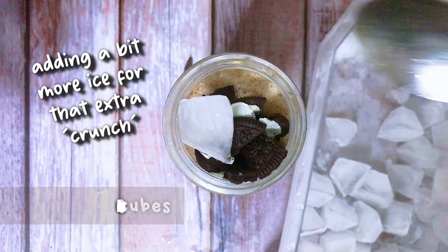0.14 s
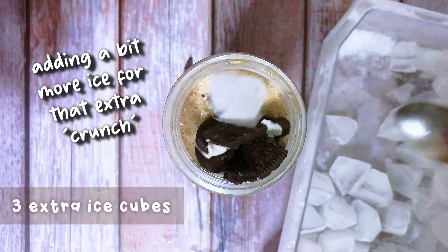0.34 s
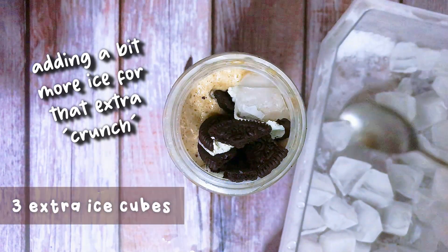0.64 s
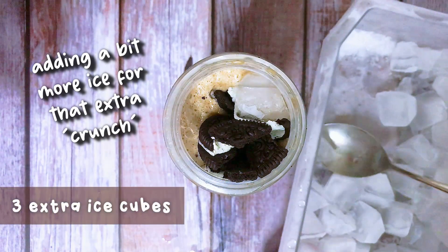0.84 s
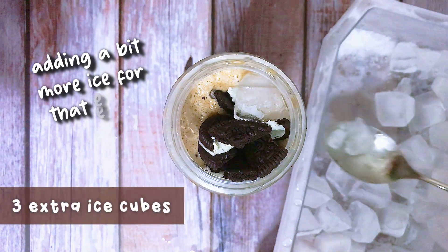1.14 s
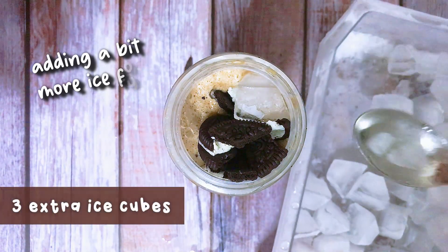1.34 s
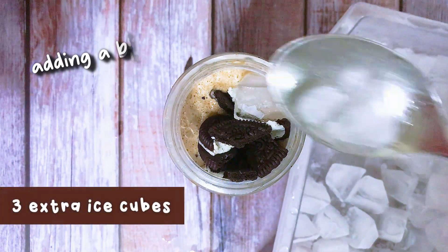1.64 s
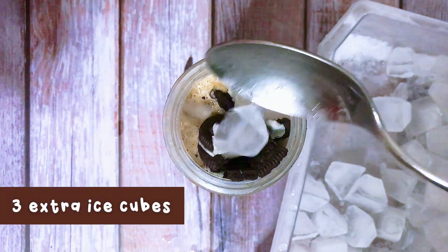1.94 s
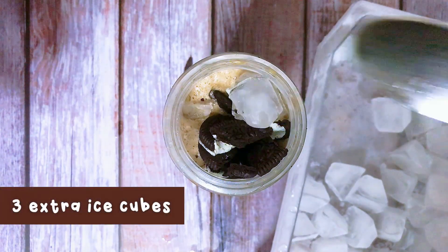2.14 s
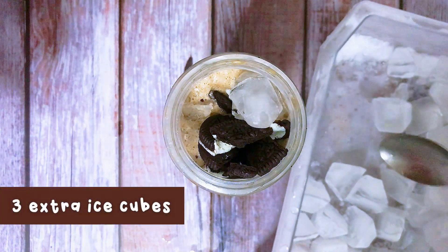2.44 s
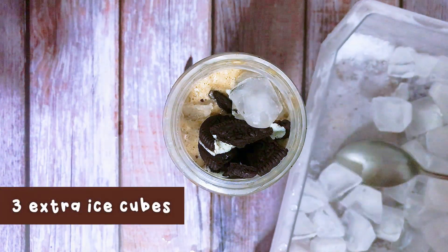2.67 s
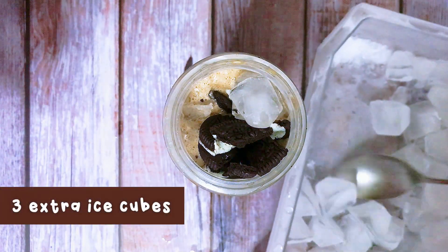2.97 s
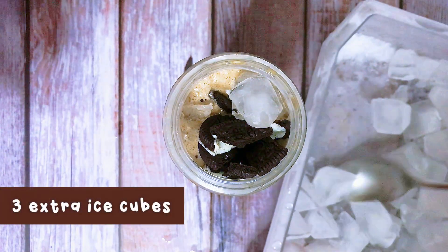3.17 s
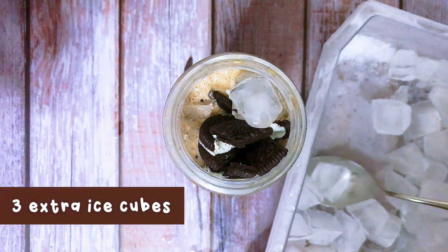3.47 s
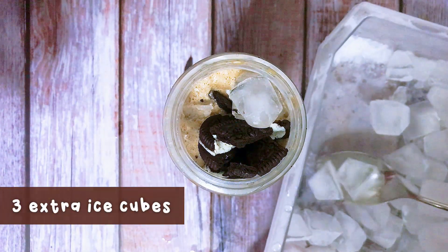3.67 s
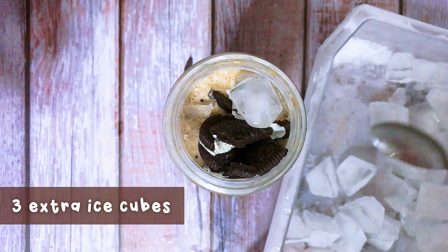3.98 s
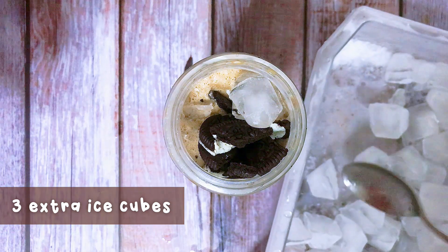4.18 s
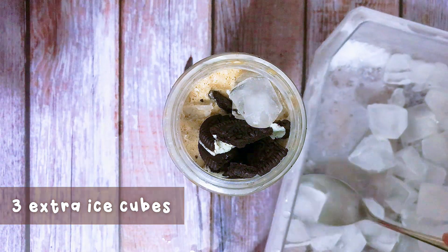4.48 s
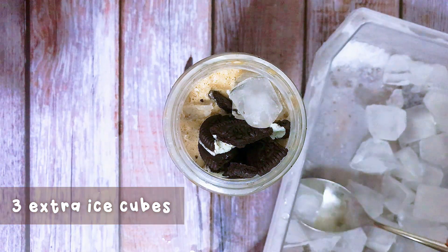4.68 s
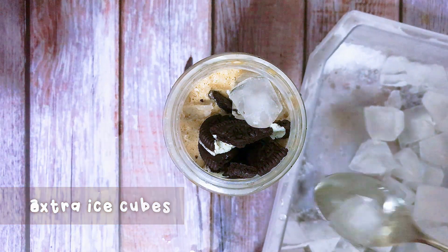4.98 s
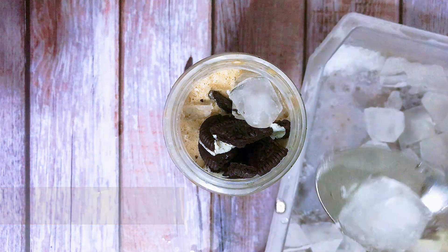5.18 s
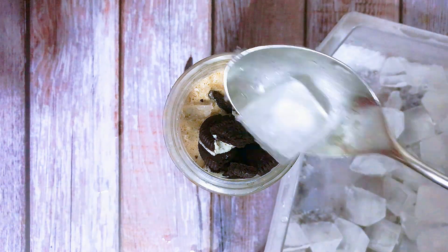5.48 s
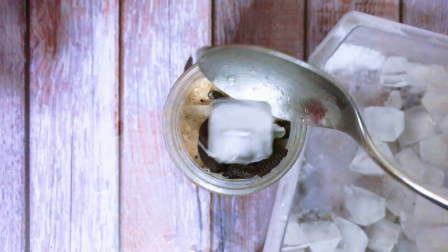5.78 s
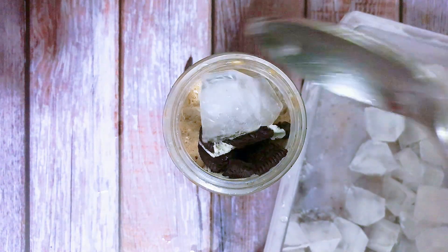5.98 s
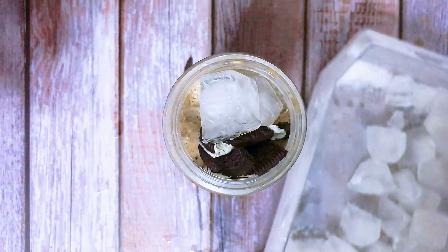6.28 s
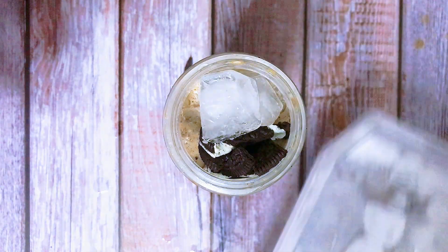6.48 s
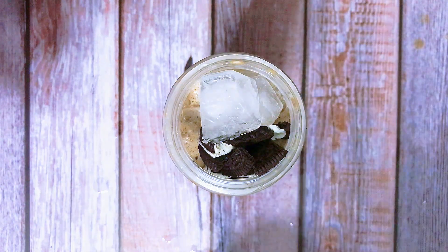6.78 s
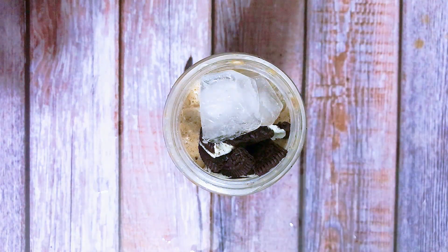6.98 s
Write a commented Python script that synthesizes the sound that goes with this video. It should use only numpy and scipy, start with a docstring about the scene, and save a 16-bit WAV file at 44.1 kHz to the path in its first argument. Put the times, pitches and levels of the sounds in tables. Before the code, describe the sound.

A metal spoon digs through ice cubes in a plastic bin, hard bright clacks and crunchy grating in bursts, with quiet pauses and soft jar ticks.

```python
"""Small kitchen: a metal spoon digs ice cubes out of a plastic bin and lowers them into iced coffee.
Knocks, jostles and light jar ticks are filtered noise rattles; grating, fizz and bin scuffs are slip grains.
Cube corners chink as decaying sines; the emptied spoon sings as resonant noise.
Sparse decaying reflections answer the ice; the dull background noise sinks while the scooping is loud."""
import sys
import numpy as np
from scipy import signal
from scipy.fft import rfft, irfft
from scipy.io import wavfile
from scipy.ndimage import uniform_filter1d, minimum_filter1d

SR = 44100
rng = np.random.default_rng(int(sys.argv[2]) if len(sys.argv) > 2 else 0)


def store_wav(level_fs):
    """Save 16-bit WAV to argv[1]."""
    pcm = np.round(np.clip(np.atleast_2d(level_fs), -1, 1) * 32767)
    wavfile.write(sys.argv[1], SR, pcm.T.astype(np.int16))


N = 313991
TAPS = 4096
HZ = np.fft.rfftfreq(TAPS, 1 / SR)
TIME_S = np.arange(N) / SR
BAND_LIMIT_HZ = 15600

# background before sinking: (time [s], level [dB], tilt above 750 Hz [dB/octave])
AIR_DRIFT = [(.2, -65.5, -3.5), (1.75, -63, -3.5), (2.5, -60, -5.5), (4.9, -62.5, -5), (5.45, -62, -1),
             (7.1, -61.5, 1.5)]
# background spectrum: (frequency [Hz], relative level [dB])
AIR_SPECTRUM = [(30, -31), (100, -26), (200, -20.5), (320, -14), (450, -4.5), (620, 4), (880, 5.5),
                (1100, -2.5), (1500, -9), (2000, -20.5), (2700, -24.5), (3800, -43.5), (6000, -46),
                (15000, -48.5)]
# bin shifts on the table, finally dragged away: (peak time [s], peak level [dB], swell rate [dB/s])
BIN_SCUFFS = [(.005, -52, 298.5), (0.519, -61, 81.5), (2.67, -55.5, 122), (4.36, -72, 200),
              (6.52, -62.5, 299.5), (7.07, -58.5, 62)]
SCUFF_STOP_DB_PER_S = 220
# spectrum of ice in the bin: (frequency [Hz], relative level [dB])
BIN_SPECTRUM = [(30, -42), (110, -39), (250, -34), (400, -25.5), (500, -16), (630, -6.5), (1000, 1.5),
                (1400, -0.5), (2000, -4), (3200, -6), (4200, -9), (5500, -16.5), (8000, -23), (14000, -29)]
# bin and spoon resonances: (frequency [Hz], width [Hz], nominal lift [dB])
BIN_SPOON_MODES = [(604, 81, 2.5), (683, 110, 3), (890, 32, 6), (975, 81, 2), (1145, 28, 1.5),
                   (1297, 20, 2), (1470, 30, 0.5), (1832, 80, 4), (2460, 87, 2), (3350, 74, 1),
                   (4080, 70, 3.5), (5243, 37, 3.5), (5942, 91, 2), (7000, 150, 3.5), (8150, 98, 3.5),
                   (8874, 150, 7.5), (9710, 50, 6)]
# room decay: (frequency [Hz], t60 [s])
ROOM_DECAY = [(200, .3), (500, .32), (1000, 0.29), (3000, 0.15), (7000, 0.09), (14000, .18)]
# cubes land or settle in the jar:
# (time [s], level over 10 ms [dB], hardness 1-5 kHz [dB/octave], upper edge [Hz])
JAR_TICKS = [(.395, -45.5, 5, 2980), (.46, -46.5, -3.5, 7800), (.477, -45, 2, 6800),
             (0.525, -42.5, 1, 7045), (2.058, -54, 4, 6460), (2.142, -55, -5, 9580), (2.154, -42, 5, 8200),
             (6.0, -47, -6.5, 6640), (6.086, -52, 2.5, 8530)]
TICK_DECAY_S, TICK_HOLLOW_HZ, TICK_CLACK_HZ = .028, 1450, 2420
# cube corners hit the spoon: (time [s], nominal level [dB])
CORNER_CHINKS = [(.467, -53), (0.524, -42.5), (0.553, -17.5), (1.177, -53), (2.133, -61), (2.154, -34),
                 (6.086, -45.5)]
# cube modes, before a small random size factor: (frequency [Hz], level [dB], t60 [s])
CUBE_MODES = [(6300, -5, .012), (7100, 3.5, 0.011), (7840, -2, 0.0078)]
# prominent knocks in the bin: (time [s], level over 10 ms [dB], rattle decay [s], hollow pitch [Hz],
# clack pitch [Hz], hardness 1-5 kHz [dB/octave], upper edge [Hz])
BIN_KNOCKS = [(.5501, -16.5, 0.043, 1490, 3190, -.5, 10500), (.573, -29.5, 0.031, 1600, 3800, 1.4, 9700),
              (.615, -37, .044, 1209, 4130, 0, 14000), (0.6691, -12.5, .027, 1140, 3740, 3, 15300),
              (0.678, -18.5, 0.032, 1670, 3100, 2.5, 13800), (0.7637, -29, 0.028, 1000, 2160, -1, 10400),
              (.815, -21, 0.024, 994, 2820, 7, 10300), (.831, -32, .08, 1000, 2860, -3.5, 13700),
              (.863, -23.5, 0.051, 1900, 3900, -1, 16000), (.908, -29, 0.026, 1810, 2590, -3.5, 8500),
              (.948, -42.5, .052, 814, 4650, -1, 9000), (1.133, -56.5, .05, 1012, 2070, -10, 3100),
              (1.153, -47, 0.034, 980, 2350, -4, 2800), (1.176, -40, .04, 950, 2370, -4, 7600),
              (1.186, -33.5, 0.067, 854, 2410, -.5, 5400), (1.304, -56, .045, 1830, 2260, -6.5, 4100),
              (2.674, -44.5, .031, 961, 2840, -4.5, 4600), (2.6988, -18.5, .048, 1084, 3320, 0.5, 9100),
              (2.728, -33, .029, 928.5, 2410, -2, 9900), (2.746, -27, 0.017, 1060, 3833, -0.3, 10400),
              (2.7744, -18, 0.02, 922, 2840, 1.6, 14000), (3.044, -32.5, .07, 1650, 2280, -2.5, 7200),
              (3.064, -24, 0.1, 1288, 4062, 0.8, 12700), (3.074, -23, 0.022, 1650, 3190, 3.5, 12910),
              (3.1103, -18, 0.028, 1360, 3780, -1, 11900), (3.138, -26, .06, 1723, 2350, -1.5, 16000),
              (3.157, -29.5, .036, 1030, 3010, -1, 16000), (3.214, -24, 0.023, 1040, 2700, -0.3, 13600),
              (3.24, -19.5, .019, 1054, 3120, 0, 8600), (3.339, -23.5, 0.056, 1330, 3290, 3.5, 5996),
              (3.419, -27.5, 0.048, 1424, 2650, 0.6, 5250), (3.486, -27.5, 0.037, 1743, 2800, 2, 5300),
              (3.762, -23.5, 0.11, 916, 2633, -8, 4500), (3.787, -25.5, 0.028, 1680, 2067, 5, 3530),
              (3.8301, -15.5, 0.027, 1200, 3290, 0.9, 7770), (3.937, -15, 0.021, 1301, 3045, 3, 8680),
              (3.943, -15.5, .055, 1226, 2530, 1.1, 8500), (4.011, -25.5, .05, 1100, 2100, -5.5, 9700),
              (4.029, -19, 0.031, 1314, 2940, 1, 9100), (4.072, -18.5, 0.021, 1120, 2840, 3, 7390),
              (4.099, -36.5, 0.034, 1180, 3100, -1, 7800), (4.272, -58, .052, 842, 2450, -17, 3200),
              (4.374, -27.5, 0.061, 803, 3205, -5, 3900), (4.402, -24.5, 0.027, 1260, 2370, -1, 7300),
              (4.432, -13.5, 0.074, 1086, 2478, 2, 11910), (4.442, -19, 0.11, 1010, 2460, -1.5, 16000),
              (4.463, -24.5, .027, 1140, 4290, 1.5, 13700), (4.501, -15.5, .05, 1270, 3230, 4.5, 16000),
              (4.514, -17, 0.044, 1120, 4140, 3, 16000), (4.566, -19, 0.039, 1185, 2040, 2.2, 16000),
              (4.569, -25, .04, 646, 2400, -9, 5000), (4.601, -18.5, 0.013, 1025, 2820, 0, 16030),
              (4.627, -29, .023, 1010, 2710, 3, 16000), (4.723, -50.5, .026, 1169, 2630, 6, 3700),
              (4.753, -48.5, .033, 1107, 2730, 2, 4300), (4.794, -40, 0.02, 1794, 2560, 6.5, 4183),
              (4.828, -51, 0.03, 1870, 2335, 0.5, 3376), (4.845, -43.5, .033, 1177, 2880, -0.3, 3590),
              (6.495, -51.5, .085, 993, 2530, -2, 3600), (6.84, -62.5, .04, 1006, 2500, -3.5, 3600),
              (7.007, -45.5, .055, 880, 2560, -1, 3390), (7.045, -51, .065, 906, 2350, -1, 3800)]
# a faint noisy lead-in a few milliseconds before each mid-stroke knock
LEAD_IN_S, LEAD_IN_DB, LEAD_IN_DECAY_S = .0055, -21, 0.062
# spoon strokes: (start [s], length before release [s], grating [dB], dry fizz [dB], jostle upper edge [Hz])
SPOON_STROKES = [(0.551, 0.27, -49, -59.5, 12000), (0.794, .14, -45, -56, 12000),
                 (1.187, .10, -60, -110, 3100), (2.709, 0.069, -39, -58.5, 10000),
                 (2.769, .035, -32.5, -37.5, 16000), (2.838, 0.085, -39, -44.5, 16000),
                 (2.929, 0.075, -43.5, -60, 14000), (3.025, 0.072, -42, -62.5, 8000),
                 (3.099, 0.067, -36.5, -44.5, 16000), (3.181, 0.094, -43, -66.5, 12000),
                 (3.301, 0.088, -40.5, -97, 5300), (3.422, 0.11, -50.5, -100, 5300),
                 (3.763, .33, -46, -86, 7000), (4.374, 0.059, -46.5, -93, 7000),
                 (4.431, .215, -35.5, -48.5, 16000), (4.696, .17, -63, -112, 3200)]
BITE_S, RELEASE_DB_PER_S = 0.028, 518.5
# dry ice on metal: (frequency [Hz], relative level [dB])
FIZZ_SPECTRUM = [(1000, -30.5), (3000, -9.5), (5000, 5.5), (8000, -1), (11000, -7), (15000, -6)]
# cubes jostled by a stroke; level is relative to the grating, spread is plus or minus
JOSTLES_PER_S, JOSTLE_DB, JOSTLE_SPREAD_DB, JOSTLE_DECAY_S = 45, 3.5, 4, 0.026
JOSTLE_HOLLOW_HZ, JOSTLE_CLACK_HZ = (900, 1720), (2160, 3960)
# background sinks above this scooping level
SINK_ABOVE_DB, SINK_DEPTH_DB, SINK_HOLD_S, SINK_GLIDE_S = -52, 16, .17, 0.17
# last cube slips off the spoon: (time [s], level [dB])
LAST_CUBE_RUB = [(5.86, -110), (5.872, -71.5), (5.892, -69), (5.91, -83), (5.97, -110)]
# spoon bowl modes: (frequency [Hz], width [Hz], relative level [dB])
BOWL_MODES = [(3560, 300, 2), (5530, 160, -7.5), (9530, 130, -5), (14120, 151.6, -8.5)]


def amp(db):
    """Decibels to gain."""
    return 10 ** (np.asarray(db) / 20)


def unit(x):
    """Scale to rms 1."""
    return x / np.sqrt(np.mean(x ** 2) + 1e-30)


def read(points, hz):
    """Interpolate a spectrum table on a log-frequency axis."""
    table_hz, value = np.transpose(points)
    return np.interp(np.log(hz + 1), np.log(table_hz), value)


def follow(rows, t_s):
    """Interpolate every column of a time table."""
    table_s, *columns = np.transpose(rows)
    return [np.interp(t_s, table_s, column) for column in columns]


def add(mix, start_s, sound):
    """Mix a sound in at start_s."""
    part = mix[max(round(start_s * SR), 0):][:len(sound)]
    part += sound[:len(part)]


def colour(x, db):
    """Minimum-phase filter with relative gain db on HZ: rings only after a blow."""
    log_gain = np.log(amp(np.maximum(db - db.max(), -100)))
    circle = np.concatenate([log_gain, log_gain[-2:0:-1]])
    response = np.fft.ifft(np.exp(np.conj(signal.hilbert(circle)))).real
    return signal.oaconvolve(x, response)[:len(x)]


def bump(centre_hz, width_hz):
    """Bell of one resonance, height 1."""
    return 1 / (1 + (2 * (HZ - centre_hz) / width_hz) ** 2)


def roll_off(edge_hz, steepness=15):
    """Steep fall above an edge, in dB."""
    return -10 * np.log10(1 + (HZ / edge_hz) ** steepness)


def resonances():
    """Lift in dB from the modes of bin and spoon."""
    return sum(db * bump(hz, width_hz) for hz, width_hz, db in BIN_SPOON_MODES)


def grains(per_s, spread_db, ring_s=0.0011, facets=16):
    """Tiny slips at random moments on many facets, each facet with its own brief ring."""
    out = np.zeros(N)
    t_s = np.arange(TAPS // 8) / SR
    for _ in range(facets):
        size = amp(spread_db * np.minimum(rng.exponential(1, N), 4))
        slips = size * (rng.random(N) < per_s / facets / SR)
        ring = rng.standard_normal(len(t_s)) * np.exp(-t_s / ring_s)
        out += signal.oaconvolve(slips, ring)[:N]
    return out - out.mean()


def air(patchy_db=4.0, pivot_hz=750):
    """Dull, slightly patchy room noise; level and brightness drift slowly."""
    hz, t_s, bins = signal.stft(rng.standard_normal(N), SR, nperseg=1024, noverlap=768)
    patches = uniform_filter1d(rng.standard_normal(bins.shape), size=8, axis=0)
    patches = unit(uniform_filter1d(patches, size=8, axis=1))
    octaves = np.log2(np.clip(hz, pivot_hz, 3500) / pivot_hz)
    tilt_db = np.outer(octaves, follow(AIR_DRIFT, t_s)[1])
    bins = bins * amp(read(AIR_SPECTRUM, hz)[:, None] + tilt_db + patchy_db * patches)
    noise = signal.istft(bins, nperseg=1024, noverlap=768)[1][:N]
    return amp(follow(AIR_DRIFT, TIME_S)[0]) * unit(noise)


def drag(edge_hz=3100, tilt_db_per_octave=-4.0):
    """Plastic scuffs over wood: dull grains in the bin walls swell, then die away."""
    shape_db = read(BIN_SPECTRUM, HZ) + resonances() + roll_off(edge_hz)
    shape_db = shape_db + tilt_db_per_octave * np.log2(HZ + 1)
    curves_db = [peak_db - np.maximum(swell * (peak_s - TIME_S), SCUFF_STOP_DB_PER_S * (TIME_S - peak_s))
                 for peak_s, peak_db, swell in BIN_SCUFFS]
    level_db = np.max(curves_db, axis=0)
    return amp(level_db) * unit(colour(grains(per_s=900, spread_db=2.5), shape_db))


def kitchen(x, delay_s=0.019, treble_db=-6.5):
    """Dense reflections from nearby walls, each band dying at its own speed."""
    count = SR // 2
    taps = rng.standard_normal(count) * (rng.random(count) < 4000 / SR)
    taps = taps * (np.arange(count) > delay_s * SR)
    hz, t_s, bins = signal.stft(taps, SR, nperseg=256)
    fade_db = -60 * t_s / read(ROOM_DECAY, hz)[:, None]
    tail = signal.istft(bins * amp(fade_db), SR, nperseg=256)[1]
    # flatten the broad spectrum, then darken it
    broad = np.sqrt(uniform_filter1d(abs(rfft(tail)) ** 2, size=200))
    tail_hz = np.fft.rfftfreq(len(tail), 1 / SR)
    tail = irfft(rfft(tail) / broad * amp(treble_db * np.log2(1 + tail_hz / 2000)))
    return signal.oaconvolve(x, tail[:SR // 3])[:N]


def knock(db, decay_s, hollow_hz, clack_hz, hardness, edge_hz, click=1.0, seat_s=.0006,
          hollow_db=10, hollow_width_hz=190, clack_db=8, clack_width_hz=240,
          treble_hz=4500, treble_life=0.94, linger=0.95):
    """One contact: a click and a dense, dying rattle with two pitches; hard contacts are bright."""
    t_s = np.arange(TAPS) / SR
    octaves = np.log2(np.clip(HZ, 1000, 5000) / 1000)
    noise = rng.standard_normal(TAPS)
    low = signal.lfilter(*signal.butter(2, treble_hz, fs=SR), noise)
    # about -57 dB at decay_s
    fade_db = -20 * (3 * t_s / max(decay_s, .005)) ** linger
    # treble speaks at once; bin walls take a moment to swing
    body = low * amp(fade_db) * (1 - np.exp(-t_s / seat_s))
    treble = .5 * (noise - low) * amp(fade_db / treble_life)
    rattle = body + treble
    rattle[0] += click
    # share energy evenly between broad bands; fine structure stays random
    broad_db = 10 * np.log10(uniform_filter1d(abs(rfft(rattle)) ** 2, size=34) + 1e-9)
    pitches_db = hollow_db * bump(hollow_hz, hollow_width_hz) + clack_db * bump(clack_hz, clack_width_hz)
    shape_db = read(BIN_SPECTRUM, HZ) + resonances() + pitches_db
    shape_db = shape_db + hardness * octaves + roll_off(edge_hz) - broad_db
    sound = colour(rattle, shape_db)
    # rms over 10 ms equals db
    return amp(db) * sound / np.linalg.norm(sound) * np.sqrt(SR / 100)


def ticks():
    """Light touches in the jar, all with the same focused ring."""
    out = np.zeros(N)
    for start_s, db, hardness, edge_hz in JAR_TICKS:
        tick = knock(db, TICK_DECAY_S, TICK_HOLLOW_HZ, TICK_CLACK_HZ, hardness, edge_hz,
                     hollow_db=13, hollow_width_hz=330)
        add(out, start_s, tick)
    return out


def chinks(onset_s=0.00032):
    """A hard cube corner excites the cube's own high modes, gone in milliseconds."""
    out = np.zeros(N)
    t_s = np.arange(TAPS) / SR
    for start_s, level_db in CORNER_CHINKS:
        size = rng.uniform(.98, 1.02)
        ring = sum(amp(db - 60 * t_s / t60_s) * np.sin(2 * np.pi * hz * size * t_s)
                   for hz, db, t60_s in CUBE_MODES)
        add(out, start_s, amp(level_db) * ring * (1 - np.exp(-(t_s / onset_s) ** 2)))
    return out


def knocks():
    """Cubes and spoon strike the bin walls and floor; a faint noisy lead-in precedes mid-stroke knocks."""
    out = np.zeros(N)
    for hit_s, db, decay_s, *tone in BIN_KNOCKS:
        add(out, hit_s, knock(db, decay_s, *tone))
        if any(start_s + BITE_S < hit_s < start_s + length_s for start_s, length_s, *_ in SPOON_STROKES):
            add(out, hit_s - LEAD_IN_S, knock(db + LEAD_IN_DB, LEAD_IN_DECAY_S, *tone))
    return out


def stroke(start_s, length_s):
    """Gain of one push of the spoon: bite, hold, release."""
    age_s = TIME_S - start_s
    release = amp(-RELEASE_DB_PER_S * np.clip(age_s - length_s, 0, 1))
    return np.clip(age_s / BITE_S, 0, 1) * release


def slide(grate_edge_hz=4600, lift=0.47):
    """Stick and slip of ice: grating sounds through the bin, finer grains fizz on the spoon."""
    grate_gain, fizz_gain = np.zeros((2, N))
    for start_s, length_s, grate_db, fizz_db, _ in SPOON_STROKES:
        push = stroke(start_s, length_s)
        grate_gain = np.maximum(grate_gain, amp(grate_db) * push)
        fizz_gain = np.maximum(fizz_gain, amp(fizz_db) * push)
    grate_shape_db = read(BIN_SPECTRUM, HZ) + lift * resonances() + roll_off(grate_edge_hz)
    fizz_shape_db = read(FIZZ_SPECTRUM, HZ) + resonances()
    grate = colour(grains(per_s=900, spread_db=2.5), grate_shape_db)
    fizz = colour(grains(per_s=1400, spread_db=3.5, ring_s=.0012), fizz_shape_db)
    return grate_gain * unit(grate) + fizz_gain * unit(fizz)


def jostles(hardness=-0.46):
    """Pushed cubes bump neighbours at uneven moments, harder where the stroke grates louder."""
    out = np.zeros(N)
    for start_s, length_s, grate_db, _, edge_hz in SPOON_STROKES:
        count = max(round(length_s * JOSTLES_PER_S), 1)
        for k, (when, strength, hollow, clack) in enumerate(rng.random((count, 4))):
            db = grate_db + JOSTLE_DB + JOSTLE_SPREAD_DB * (2 * strength - 1)
            hollow_hz = np.interp(hollow, [0, 1], JOSTLE_HOLLOW_HZ)
            clack_hz = np.interp(clack, [0, 1], JOSTLE_CLACK_HZ)
            bump_sound = knock(db, JOSTLE_DECAY_S, hollow_hz, clack_hz, hardness, edge_hz,
                               hollow_db=11.5, clack_db=11)
            add(out, start_s + length_s * (k + when) / count, bump_sound)
    return out


def trailing(running_filter, x, seconds):
    """Run a mean or minimum over the last few moments."""
    size = max(round(seconds * SR), 1)
    return running_filter(x, size, origin=(size - 1) // 2)


def sinking(ice, listen_s=.1, knee_db=4):
    """Background gain: glides down under loud ice, waits, glides back."""
    level_db = 10 * np.log10(abs(uniform_filter1d(ice ** 2, round(listen_s * SR))) + 1e-12)
    calm = np.clip((SINK_ABOVE_DB - level_db) / knee_db + 1, 0, 1)
    held = trailing(minimum_filter1d, calm, SINK_HOLD_S)
    glided = trailing(uniform_filter1d, held, SINK_GLIDE_S)
    return amp(SINK_DEPTH_DB * (glided - 1))


def spoon(scratch_db=-24):
    """A soft rub scratches the bowl of the spoon and sets it singing."""
    bowl = amp(scratch_db) + sum(amp(db) * bump(hz, width_hz) for hz, width_hz, db in BOWL_MODES)
    ring = colour(rng.standard_normal(N), 20 * np.log10(bowl))
    return amp(follow(LAST_CUBE_RUB, TIME_S)[0]) * unit(ring)


def scene(room_db=-12):
    """Ice and spoon up close, their kitchen reflections and the background behind."""
    background = air()
    small = drag() + ticks() + chinks() + spoon()
    scooping = knocks() + slide() + jostles()
    near = scooping + small
    room = amp(room_db) * kitchen(near)
    return (near + room + background * sinking(scooping))[None]


def record(dry):
    """A fast limiter holds the sharpest peaks; then the band limit."""
    ceiling = .78
    gain = minimum_filter1d(ceiling / np.maximum(abs(dry), ceiling), size=81)
    held = dry * uniform_filter1d(gain, size=81)
    low_pass = signal.firwin(127, BAND_LIMIT_HZ, window=("kaiser", 8), fs=SR)
    return signal.oaconvolve(held, low_pass[None], "same")


dry = scene()
out = record(dry)
store_wav(out)
```